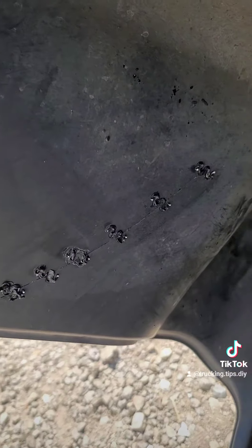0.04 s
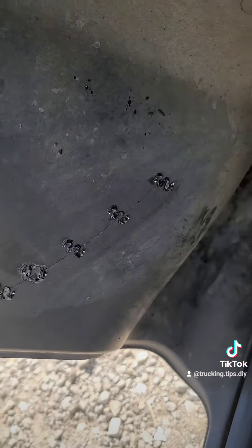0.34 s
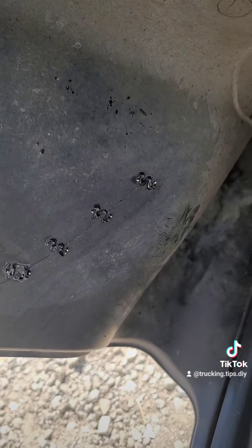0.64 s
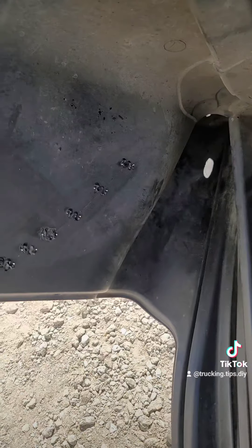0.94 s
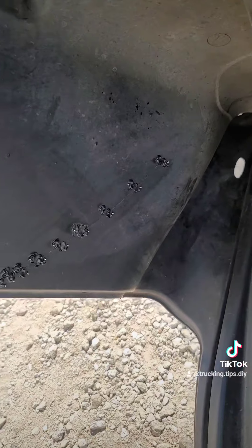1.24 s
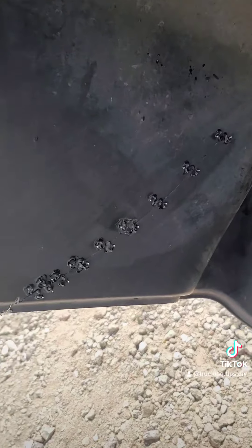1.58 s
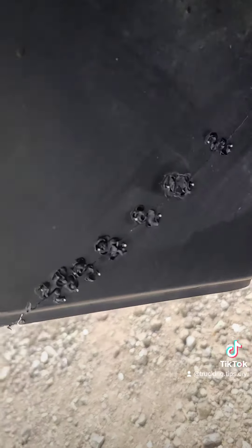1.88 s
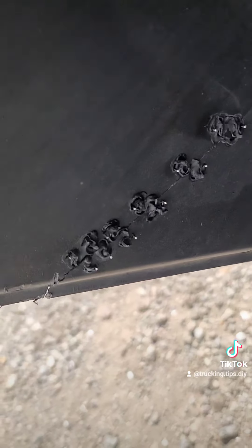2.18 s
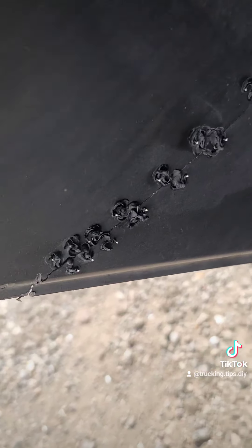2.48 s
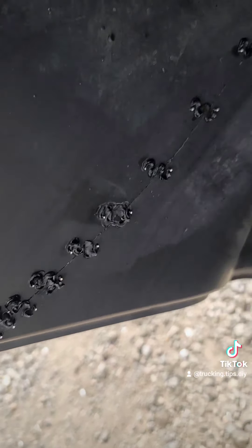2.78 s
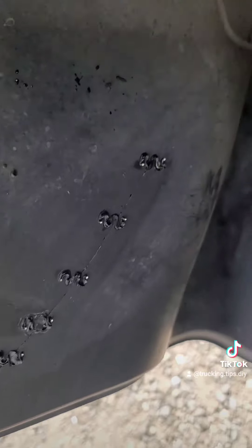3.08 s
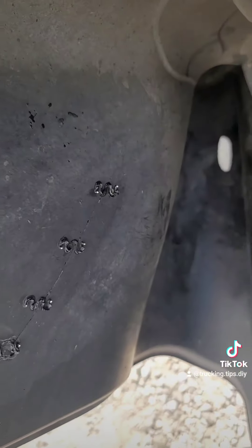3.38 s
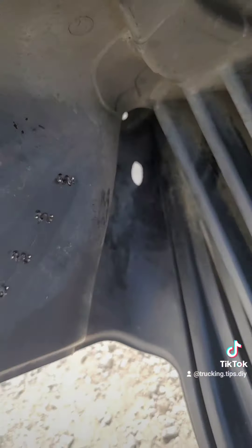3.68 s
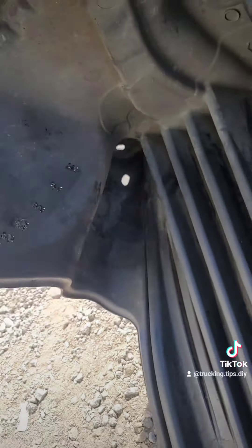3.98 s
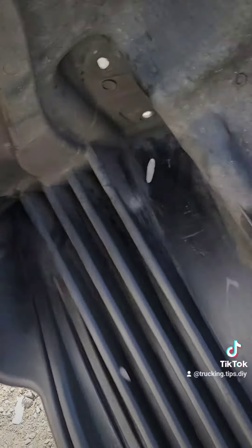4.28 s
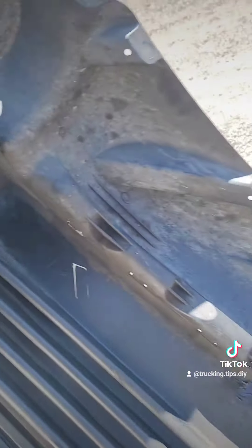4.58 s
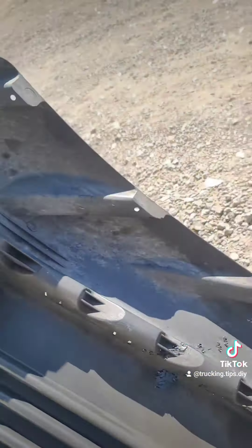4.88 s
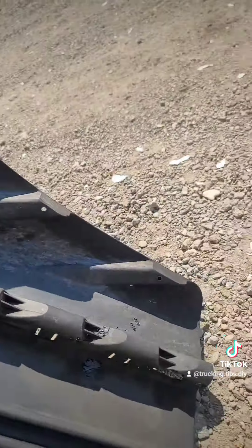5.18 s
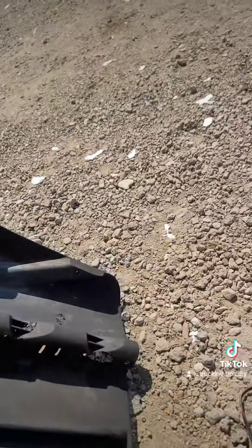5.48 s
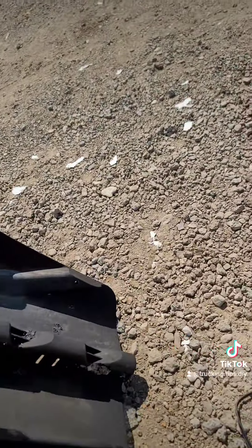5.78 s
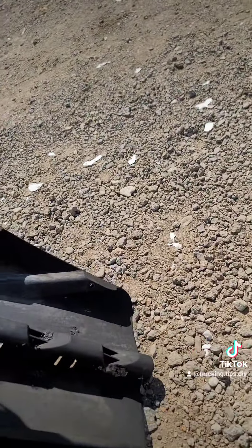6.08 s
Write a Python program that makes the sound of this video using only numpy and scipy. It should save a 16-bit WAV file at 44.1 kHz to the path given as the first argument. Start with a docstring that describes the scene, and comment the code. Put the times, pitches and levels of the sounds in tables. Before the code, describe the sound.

A low outdoor rumble and faint hum lie under quiet gravel scuffs and a single plastic clack. Then comes a busy run of hollow thumps, sharp clacks and crunching steps as a large plastic panel is moved, bending and hissing under a hand. After a short lull it knocks again several times. Everything is close to the stereo microphone, which catches a few soft, deep thuds like wind.

```python
"""Plastic panel on a gravel lot

Close to a stereo pair, someone shifts about holding a big moulded plastic panel, then steps round and turns it
over. Each scuff crunches the stones and leaves them trickling. The panel's edge clacks on them, its hollow
shell booms and bends, and a hand slides over it. The low rumble of the open lot lies under everything, with a
few deep thuds of heavy footfalls felt through the ground."""
import sys
import numpy as np
from scipy import signal
from scipy.fft import rfft, irfft
from scipy.io import wavfile
from scipy.ndimage import uniform_filter1d

SR = 44100
rng = np.random.default_rng(int(sys.argv[2]) if len(sys.argv) > 2 else 0)


def dump(signal):
    """Clip the signal to [-1, 1] and save it as 16-bit WAV at the path in sys.argv[1]."""
    limited = np.clip(np.atleast_2d(signal).T, -1, 1)
    pcm = np.round(limited * 32767).astype(np.int16)
    wavfile.write(sys.argv[1], SR, pcm)


N = 279547
TIME = np.arange(N) / SR

# spectra of a contact's low body, middle crack and high snap: f/Hz, level/dB
BODY_TONE = [(30, -53), (150, -22), (350, 5), (700, 3), (1200, 2.5), (1700, -4.5), (2600, -30), (6000, -57)]
CRACK_TONE = [(700, -22.5), (1500, -1.5), (2150, -0.5), (2520, -0.5), (3100, 3), (4400, -5.5), (5300, -9),
              (7000, -18.5), (9000, -37.5), (16000, -35)]
SNAP_TONE = [(2500, -20), (5000, -1), (7000, 3.5), (8800, -6.5), (11000, -0.5), (13000, -9), (15500, -5.5)]
# stereo width at the microphones: f/Hz, side minus mid/dB
WIDTH = [(60, -10.5), (200, -18), (380, -4.5), (700, -5.5), (1290, -1.5), (2380, 0), (4400, -0.5),
         (9000, -1)]


def from_db(db):
    """Decibels to gain."""
    return 10 ** (np.asarray(db) / 20)


def at_hz(points, hz):
    """Gain of a spectrum at the given frequencies."""
    f, db = np.transpose(points)
    return from_db(np.interp(np.log(hz + 1), np.log(f), db))


def panned(left_db):
    """Gains of the two channels for a level difference."""
    return from_db(np.array([[left_db], [-left_db]]) / 2)


def add(out, s, sound):
    """Mix a sound in at s seconds."""
    at = max(round(s * SR), 0)
    out[:, at:at + sound.shape[1]] += sound[:, :N - at]


def swell(t, rise_s):
    """A smooth rise from 0 to 1."""
    return np.sin(np.pi / 2 * np.minimum(t / rise_s, 1)) ** 2


def even(x, span_s):
    """Hold the slow level at rms 1 and keep the fast flutter."""
    size = max(int(span_s * SR / 2), 1)
    power = np.mean(x ** 2, axis=0)
    return x / np.sqrt(uniform_filter1d(uniform_filter1d(power, size), size) + 1e-9)


def noise(tone, size=N):
    """Stereo noise of a given colour, narrow in the bass and wide in the treble; mid rms 1."""
    hz = np.arange(size // 2 + 1) * SR / size
    rolloff = 1 / (1 + (hz / (2 * tone[-1][0])) ** 4)
    mid, side = rfft(rng.standard_normal((2, size))) * at_hz(tone, hz) * rolloff
    mid, side = irfft(mid, size), irfft(side * at_hz(WIDTH, hz), size)
    return np.array([mid + side, mid - side]) / mid.std()


def strokes(rows, attack_s, sag_db, release_t60):
    """Each push builds up, holds while it eases off a little, and dies away: a gain per sample."""
    out = np.zeros((1, N))
    for s, length_s, db in rows:
        t = TIME[None, :int((attack_s + length_s + release_t60) * SR)]
        held = t - attack_s / 2
        eased_db = sag_db * np.minimum(held / length_s, 1)
        released_db = 60 * np.maximum(held - length_s, 0) / release_t60
        add(out, s - attack_s / 2, swell(t, attack_s) * from_db(db - eased_db - released_db))
    return out[0]


def outdoors():
    """The open lot: a low rumble with brief buffets, a steady distant hum and faint air."""
    # course of the rumble: t/s, level/dB
    rumble_curve = [(0.0, -64.5), (0.08, -50), (0.42, -52), (0.5, -58), (0.73, -62.5), (0.79, -50),
                    (1.6, -53.5), (1.9, -45.5), (2.12, -60), (2.45, -47), (2.65, -56), (3.1, -53),
                    (3.3, -51.5), (5.1, -50.5), (5.5, -53), (5.7, -46.5), (6.34, -50.5)]
    # low buffets on top of it: t/s, length/s, level/dB
    buffet_rows = [(0.9, 0.04, -43.5), (1.27, 0.024, -44), (1.66, 0.054, -45.5), (3.57, 0.032, -41),
                   (3.73, 0.058, -32), (4.24, 0.059, -34), (4.42, 0.14, -42.5), (4.7, .025, -42),
                   (4.9, 0.1, -44.5), (5.6, 0.13, -51), (5.89, 0.039, -36), (6.09, 0.12, -50)]
    # spectra of rumble, hum and air: f/Hz, level/dB
    rumble_tone = [(15, -33), (30, -10), (55, 0), (90, 1), (140, -6.5), (190, -9), (235, -19), (320, -25.5),
                   (500, -36), (1000, -56.5)]
    hum_tone = [(20, -57.5), (130, -24.5), (168, -3), (188, 1.5), (204, -10.5), (240, -24.5), (500, -69)]
    air_tone = [(100, -3), (400, 0), (510, -11.5), (660, -7), (1000, -19.5), (2000, -28.5), (3300, -31.5),
                (5000, -40), (16000, -42.5)]
    drift = from_db(np.interp(TIME, *np.transpose(rumble_curve)))
    buffets = strokes(buffet_rows, attack_s=0.01, sag_db=2.0, release_t60=0.35)
    rumble = np.hypot(drift, buffets) * even(noise(rumble_tone), span_s=0.39) * panned(0.74)
    return rumble + from_db(-60.5) * noise(hum_tone) + from_db(-75.5) * noise(air_tone)


def contact_noise(tone, size, ripple_db=5.5, ripple_hz=130):
    """Noise with the uneven peaks that give each stone or other contact its own pitch; rms 1."""
    hz = np.arange(size // 2 + 1) * SR / size
    peaks = np.interp(hz / ripple_hz, np.arange(512), rng.standard_normal(512))
    voice = irfft(rfft(noise(tone, size)) * from_db(ripple_db * peaks), size)
    return voice / voice.std()


def clacks(tail_db=-27, body_tail_t60=0.19, size=8192):
    """Stones and panel edge strike: each contact swells, dies soonest in the treble and rings faintly."""
    # sharp contacts: peak t/s, body/dB, crack/dB, snap/dB, body t60/s, left minus right/dB
    contacts = [(0.705, -87, -79, -96, 0.094, -13), (0.807, -71.5, -78, -77, 0.0087, 18),
                (1.068, -66, -67.5, -75, 0.077, -4), (1.471, -41.5, -32, -53.5, .04, -3.5),
                (1.649, -65.5, -70.5, -98, 0.088, -1), (1.744, -59, -64.5, -66.5, 0.049, -2),
                (1.872, -82, -64, -79, 0.093, -2), (1.977, -47.5, -60, -74, 0.0093, -16),
                (2.061, -56.5, -60, -95, 0.15, 2), (2.118, -53, -85, -93, .025, -10),
                (2.226, -59.5, -58.5, -78, 0.21, -2), (2.298, -53.5, -61.5, -75, 0.17, 0),
                (2.658, -55.5, -52, -63, 0.055, 2.5), (2.885, -60.5, -53, -78, 0.039, 1),
                (3.037, -61, -82.5, -92, 0.036, -2), (3.435, -66, -62, -87, 0.059, -8),
                (3.574, -40.5, -38.5, -51.5, 0.094, -0.5), (3.687, -53, -44, -65, 0.15, -2),
                (3.736, -38.5, -32.5, -51, 0.06, -2), (3.963, -31, -44, -59, 0.051, -2.5),
                (3.986, -36, -49, -75, 0.042, -6), (3.996, -34, -49.5, -63, 0.06, 0),
                (4.081, -59, -72, -54, 0.056, 4), (4.14, -53, -42.5, -48.5, 0.073, -3.5),
                (4.21, -52, -51, -54, 0.11, -7), (4.242, -36, -43, -56, .022, 2),
                (4.283, -54, -47, -44.5, 0.047, -1), (4.304, -58, -64, -52, 0.043, 1),
                (4.365, -57, -47.5, -53, 0.098, 3), (4.395, -27, -35.5, -49.5, 0.082, -1),
                (4.424, -47, -38, -45.5, 0.061, -2.5), (4.477, -44, -37, -45.5, 0.054, -6.5),
                (4.491, -27.5, -20, -42, 0.033, -2), (4.521, -44, -44, -48, 0.033, -1),
                (4.549, -33, -52, -62.5, .07, -1), (4.561, -35, -39, -38, 0.053, -13.5),
                (4.59, -32, -30, -37, 0.1, -3.5), (4.62, -32.5, -33.5, -43, 0.059, 0),
                (4.644, -29, -26.5, -36, 0.046, -4.5), (4.847, -48, -39.5, -34, 0.041, -1.5),
                (4.871, -58.5, -52, -41, 0.038, -5), (4.914, -46, -63, -58, .11, 0),
                (4.964, -37.5, -49, -52.5, 0.1, -2), (5.184, -46.5, -80, -80, 0.027, -4),
                (5.597, -44, -43.5, -57, 0.036, -2), (5.618, -39.5, -55, -81, 0.087, -6),
                (5.7, -36, -46.5, -69, 0.017, -4.5), (5.726, -52, -52.5, -59, .06, -4),
                (5.839, -54, -58, -57, .2, -6), (5.906, -51, -58, -64, .06, -5.5),
                (6.022, -62, -62, -51, .032, -5), (6.044, -28, -36.5, -39.5, 0.044, -0.5),
                (6.055, -24.5, -27.5, -38.5, 0.055, -7.5), (6.123, -46, -55.5, -71, 0.11, -4)]
    out, t = np.zeros((2, N)), TIME[:size]
    for s, body_db, crack_db, snap_db, t60, left_db in contacts:
        rise_s = 0.0055 * min(t60 / 0.0097, 1)  # the driest ticks start more abruptly
        bands = [(BODY_TONE, body_db, 1, 0), (CRACK_TONE, crack_db, 0.75, 0),
                 (SNAP_TONE, snap_db, 0.52, 3.0)]
        for tone, db, decay_scale, lean_left_db in bands:
            age = np.maximum(t - rise_s, 0) / decay_scale
            decay = from_db(-60 * age / t60) + from_db(tail_db - 60 * age / body_tail_t60)
            shape = swell(t, rise_s) * decay
            burst = contact_noise(tone, size) * shape
            burst *= np.sqrt(np.mean(shape ** 2) / np.mean(burst ** 2))
            add(out, s - rise_s - 0.001, from_db(db) * burst * panned(left_db + lean_left_db))
    return out


def hollow_panel(x, direct_db=-4.5, ring_db=-6.5):
    """Sounds next to the hollow panel take on its resonances and bounce around inside it."""
    # upper resonances of the panel: f/Hz, width/Hz, level/dB relative to ring_db
    resonances = [(751.3, 17, 6), (807, 25, -2.5), (980, 40, -2.5), (1050, 25, -8.5), (1299, 41, 4.5),
                  (1502, 26, 3.5), (2031, 53, 5), (2256, 150, 7), (2795, 45, 0.5), (3102, 150, 2),
                  (3720, 72, -4), (4150, 340, -0.5), (4570, 150, -12), (6590, 400, -4)]
    # reflections in the hollow: left delay/s, right delay/s, level/dB
    echoes = [(.0007, .0011, -15.5), (.0019, .0015, -20.5), (.0027, .0034, -35), (.0049, .0043, -17.5)]
    rung = from_db(direct_db) * x
    for hz, width_hz, db in resonances:
        resonator = signal.iirpeak(hz, hz / width_hz, fs=SR)
        rung += from_db(ring_db + db) * signal.lfilter(*resonator, x + 1e-18)
    out = rung.copy()
    for left_s, right_s, db in echoes:
        add(out, left_s, from_db(db) * rung * [[1], [0]])
        add(out, right_s, from_db(db) * rung * [[0], [1]])
    return out


def grains(tone, per_s, spread_db, rise_s, t60, kinds=8, size=4096):
    """Small contacts of several kinds come at random times and strengths; rms 1."""
    t = TIME[:size]
    fade = swell(t, rise_s) * from_db(-60 * t / t60) * (1 - t / t[-1])
    out = 0
    for _ in range(kinds):
        hits = rng.random(N) < per_s / kinds / SR
        strength = from_db(spread_db * np.minimum(rng.exponential(1, N), 3.5))
        clicks = hits * strength * rng.choice([-1, 1], N)
        out = out + signal.oaconvolve(clicks[None], contact_noise(tone, size) * fade, axes=1)[:, :N]
    return out / out.std()


def clumps(per_s, depth_db):
    """Contacts give way in little avalanches: a gain that wanders quickly."""
    return from_db(depth_db * np.interp(TIME * per_s, np.arange(2048), rng.standard_normal(2048)))


def trickling(push, trickle_db=-17, t60=1.7):
    """Disturbed stones go on settling: the gain of a push with a faint, slowly dying tail."""
    fade = from_db(-60 * TIME / t60)
    return np.maximum(push, from_db(trickle_db) * np.maximum.accumulate(push / fade) * fade)


def gravel(coarse_creep_db=-82, fine_creep_db=-96.5):
    """Coarse stones grind and small ones crackle in the same clumps; a standing weight makes them creep."""
    # shoe or panel pushes the stones aside: t/s, length/s, coarse level/dB, fine level/dB
    scuffs = [(0.89, 0.025, -80, -80.5), (1.031, 0.026, -76, -70), (1.439, 0.078, -73, -70.5),
              (1.709, 0.027, -69.5, -71), (1.802, 0.56, -68.5, -71.5), (2.324, .12, -71, -82.5),
              (2.785, 0.095, -78, -73), (3.205, 0.069, -64, -75.5), (3.3, 0.65, -80, -75),
              (3.546, 0.091, -51.5, -53.5), (3.669, .13, -44.5, -50), (3.934, 0.034, -58, -68),
              (4.027, 0.22, -53.5, -56), (4.211, 0.079, -45, -48), (4.362, 0.07, -41.5, -46.5),
              (4.469, 0.17, -40, -48.5), (4.647, 0.2, -78, -65.5), (4.844, 0.043, -50.5, -55.5),
              (4.905, 0.077, -42.5, -54), (5.049, 0.23, -67.5, -69), (5.526, 0.051, -57.5, -68),
              (5.582, .2, -52.5, -59), (5.84, 0.016, -50, -55.5), (6.028, 0.019, -68.5, -57),
              (6.111, 0.01, -55, -64), (6.166, 0.12, -85, -81)]
    s, length_s, coarse_db, fine_db = np.transpose(scuffs)
    coarse_push = strokes(zip(s, length_s, coarse_db), attack_s=0.04, sag_db=4.0, release_t60=0.2)
    fine_push = strokes(zip(s, length_s, fine_db), attack_s=0.047, sag_db=2.0, release_t60=0.23)
    coarse = from_db(coarse_creep_db) + trickling(coarse_push)
    fine = from_db(fine_creep_db) + trickling(fine_push)
    slips = clumps(per_s=80, depth_db=2.5)
    grinding = slips * grains(BODY_TONE, per_s=450, spread_db=1.5, rise_s=0.00057, t60=0.031)
    crackle = slips * grains(CRACK_TONE, per_s=500, spread_db=1.5, rise_s=0.00059, t60=0.036)
    return (coarse * even(grinding, span_s=0.18) + fine * even(crackle, span_s=0.25)) * panned(-2.5)


def shell_bending():
    """The plastic shell mutters as it bends in the hands."""
    # bends: t/s, length/s, level/dB
    bends = [(1.46, 0.23, -59.5), (1.82, 0.37, -60.5), (2.25, 0.18, -58.5), (3.24, 0.27, -63),
             (3.57, 0.28, -41), (3.96, 0.49, -44), (4.5, 0.14, -38), (4.72, 0.33, -47.5),
             (5.12, 0.097, -57), (5.55, 0.25, -46.5), (5.88, .1, -51), (6.04, 0.062, -37)]
    # spectrum of the flexing plastic: f/Hz, level/dB
    flex_tone = [(20, -57), (70, -25), (130, 2), (200, 4), (280, 3.5), (380, -9), (520, -13), (900, -35),
                 (2000, -73)]
    mutter = even(grains(flex_tone, per_s=400, spread_db=-2.5, rise_s=0.012, t60=0.11), span_s=0.12)
    return strokes(bends, attack_s=0.0086, sag_db=1.5, release_t60=0.26) * mutter


def shell_knocks(scatter_rad=0.85, size=20000):
    """A blow's place favours some of the shell's modes; the fewer it catches, the longer they ring."""
    # blows that make the shell boom: t/s, peak level/dB, centre f/Hz, spread/octaves
    blows = [(1.473, -29.5, 323, 0.95), (3.038, -50, 402, 0.83), (3.573, -27.5, 380, 0.77),
             (3.685, -22, 217, 1.3), (3.747, -27, 276, 0.29), (3.962, -18.5, 350, 1.34),
             (3.995, -21, 248, 1.2), (4.023, -29, 199, 0.24), (4.243, -20, 196, 1.04),
             (4.402, -31.5, 266, 0.42), (4.547, -14.5, 256, 1.16), (4.612, -26, 245, 0.45),
             (4.653, -29.5, 272, 0.47), (4.713, -33, 256, 0.051), (4.788, -43, 260, 0.14),
             (4.847, -34.5, 277, 0.2), (4.912, -26.5, 224, 1), (4.959, -26, 370, 1.1),
             (5.597, -30, 238, 1.34), (5.698, -20, 201, 0.2), (5.726, -27.5, 275, 1.1),
             (5.905, -20.5, 230, 0.92), (6.042, -28.5, 293, 1.5)]
    # low modes of the shell: f/Hz, level/dB
    modes = [(122, -14), (178, -3), (207, 3), (243, 0), (280, 0), (325, 0), (410, -4.5), (459, 2),
             (525, -2.5), (725, -0.5), (868, 4.5)]
    out, t = np.zeros((2, N)), TIME[:size]
    hz, mode_db = np.transpose(modes)[:, :, None]
    for s, peak_db, centre_hz, spread in blows:
        t60 = 0.18 / spread ** 0.34 / (hz / 230) ** 0.57  # high modes die first
        weight = from_db(mode_db - 9 * np.abs(np.log2(hz / centre_hz)) / spread)
        phase = scatter_rad * rng.standard_normal(hz.shape)
        mic_phase = at_hz(WIDTH, hz) * rng.standard_normal((2,) + hz.shape)
        ringing = weight * from_db(-60 * t / t60) * np.sin(2 * np.pi * hz * t + phase + mic_phase)
        boom = ringing.sum(axis=1) * swell(t, rise_s=0.0015)
        add(out, s, from_db(peak_db) * boom / np.abs(boom).max())
    return out


def low_thuds(rise_s=0.0071, size=16384):
    """Short, deep thuds, dead centre: heavy footfalls felt through the ground."""
    # thuds: t/s, level/dB, f/Hz, t60/s
    thuds = [(1.859, -38, 62.3, .15), (2.523, -36, 60.5, 0.29), (3.735, -34, 41.6, 0.2),
             (3.853, -28, 64.6, 0.3), (4.912, -30.5, 93, 0.32)]
    out, t = np.zeros((2, N)), TIME[None, :size]
    for s, db, hz, t60 in thuds:
        add(out, s, from_db(db - 60 * t / t60) * swell(t, rise_s) * np.sin(2 * np.pi * hz * t))
    return out


def hand_slides(tick_db=-3.5):
    """A hand hisses over the panel in tiny slips and ticks where it catches and snaps free."""
    # slides over the plastic: t/s, length/s, level/dB
    slides = [(3.56, 0.11, -65), (3.665, 0.12, -52.5), (3.97, 0.051, -76), (4.05, 0.11, -63.5),
              (4.205, 0.093, -53), (4.37, 0.24, -53.5), (4.765, 0.047, -71), (4.84, 0.13, -60),
              (5.04, 0.051, -65), (5.12, 0.13, -65.5), (5.545, 0.046, -64), (5.69, 0.086, -57.5),
              (5.835, 0.089, -68), (6.045, 0.018, -59.5)]
    # spectrum of the hiss: f/Hz, level/dB
    slide_tone = [(800, -11), (3000, -1), (7000, -0.5), (9000, -3.5), (10500, 0.5), (13000, 2),
                  (15500, -10.5)]
    slips = clumps(per_s=120, depth_db=0.5)
    hiss = slips * grains(slide_tone, per_s=5100, spread_db=1.0, rise_s=0.00025, t60=0.004)
    ticks = grains(SNAP_TONE, per_s=60, spread_db=1.5, rise_s=0.0004, t60=0.014, kinds=4)
    sliding = strokes(slides, attack_s=0.046, sag_db=4.5, release_t60=0.23)
    return hollow_panel(sliding * (hiss + from_db(tick_db) * ticks)) * panned(1.5)


def scene():
    """Stones and panel close to the microphones, the lot around them."""
    stones = hollow_panel(gravel() + clacks())
    return stones + shell_knocks() + low_thuds() + shell_bending() + hand_slides() + outdoors()


def record(dry):
    """A steep low-pass at 15.9 kHz on both microphones."""
    return signal.sosfilt(signal.ellip(12, 0.1, 80, 15900, fs=SR, output="sos"), dry)


dry = scene()
out = record(dry)
dump(out)
```